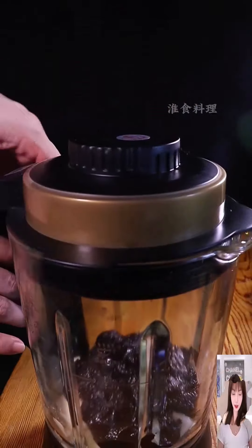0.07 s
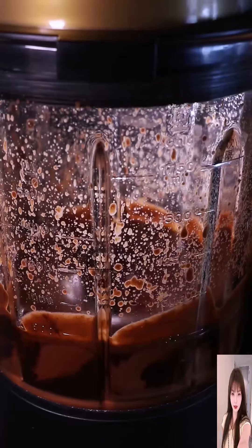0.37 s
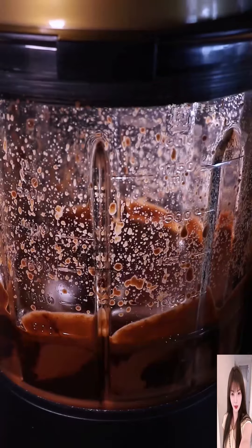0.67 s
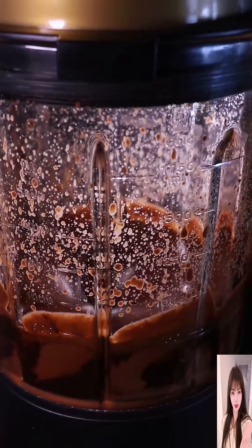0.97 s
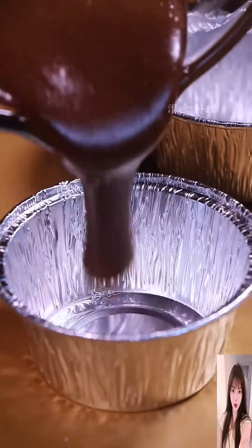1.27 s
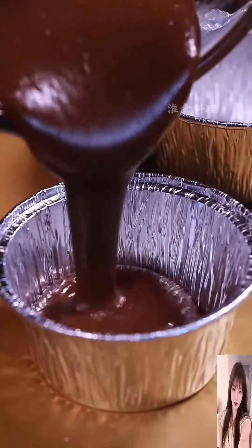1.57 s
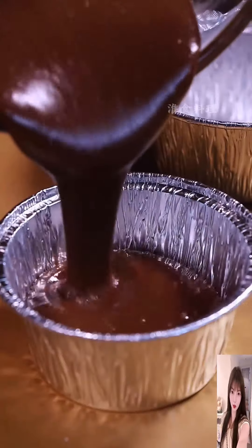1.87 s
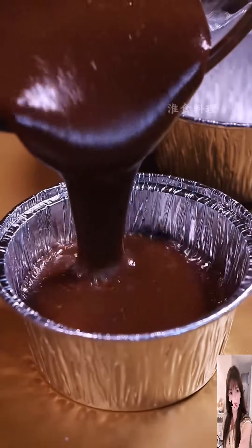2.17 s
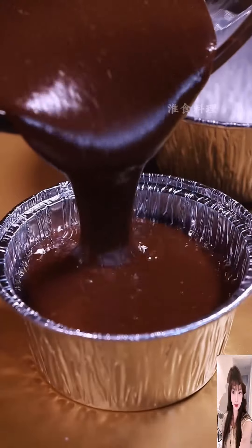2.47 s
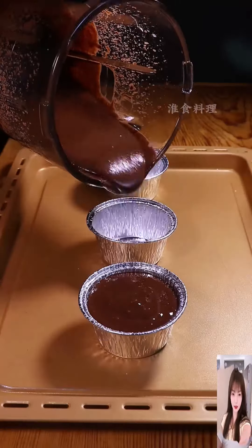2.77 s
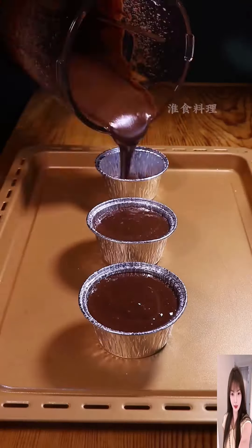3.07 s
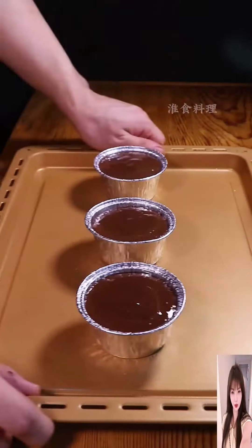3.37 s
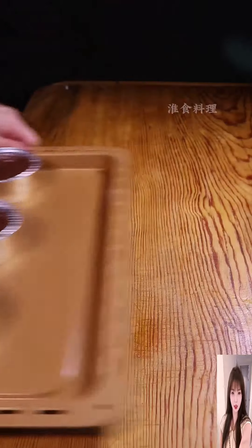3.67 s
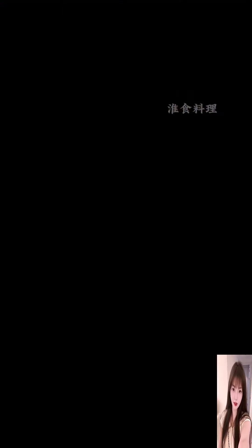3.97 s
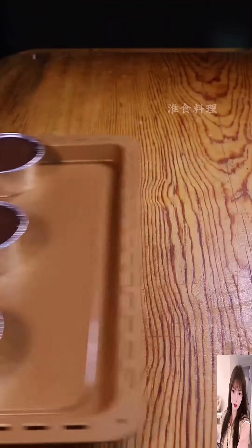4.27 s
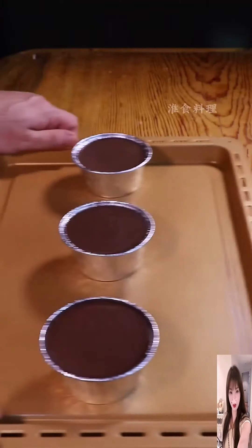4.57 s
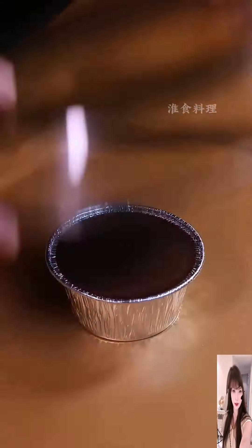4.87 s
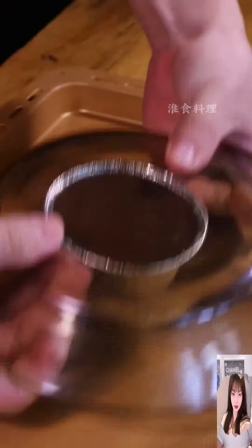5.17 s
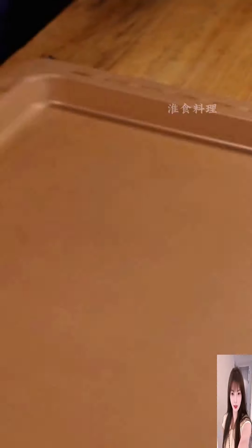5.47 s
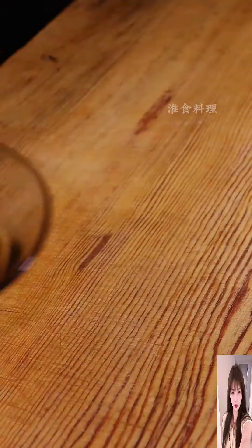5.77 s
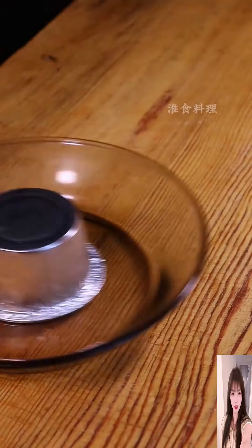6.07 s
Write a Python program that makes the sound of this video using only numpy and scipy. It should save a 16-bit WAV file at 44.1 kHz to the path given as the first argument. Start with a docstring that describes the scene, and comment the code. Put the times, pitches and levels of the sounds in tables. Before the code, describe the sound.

Heard close up at a wooden kitchen table, sharp knocks and lid rubbing lead into a brief, spattering blender churn. A quiet stretch follows, with crisp foil taps, softly popping batter and a clink of the jug. Then a metal tray slides twice with a ringing, juddering scrape, a glass plate lands with a hard knock, the tray scrapes once more, and the plate is pushed across the wood to a soft thud.

```python
"""A wooden kitchen table, close up, where chocolate puddings are being made. A blender jar is knocked
about, its lid is pressed home, and the blades churn batter for a second. Batter pours quietly into foil
cups, popping with air pockets, and a jug clinks. A metal baking tray slides over the table three times,
the wood grain plucking the sheet into a ringing scrape. A glass plate is knocked down and grinds
across the wood. Faint room air lies underneath."""
import sys
import numpy as np
from scipy import signal
from scipy.fft import rfft, irfft
from scipy.io import wavfile
from scipy.ndimage import uniform_filter1d

SR = 44100
rng = np.random.default_rng(int(sys.argv[2]) if len(sys.argv) > 2 else 0)


def inscribe(sig):
    """Save sig as 16-bit PCM at rate SR to the path in sys.argv[1].

    A 1-D sig is mono; a 2-D sig holds one channel per row.
    Samples are clipped to [-1, 1] before scaling.
    """
    pcm = np.round(np.clip(np.atleast_2d(sig).T, -1, 1) * 32767)
    wavfile.write(sys.argv[1], SR, pcm.astype(np.int16))


N = 277830
TIME = np.arange(N) / SR

# EQ of the churning batter: f/Hz, level/dB
CHURN_EQ = [(25, -26), (72, -15), (135, 0.5), (220, 0), (380, -1), (950, 4.5), (2400, 1), (2800, -3.5),
            (3500, -3), (4050, -5.5), (4400, -12), (4900, -11), (5400, -5.5), (6550, -4), (6850, -11.5),
            (7300, -19.5), (8200, -14), (9600, -29), (11500, -34), (15500, -38.5)]
# body of the filled jar: f/Hz, width/Hz, level/dB
JAR_RESONANCES = [(217.2, 19, 7), (318, 5.3, -6.5), (441, 22, -2.5), (519, 8.8, -2.5), (675, 35, 0),
                  (913, 11, 2.5), (1160, 32, -20), (1300, 45, 1.5), (1500, 13, -0.5), (1794, 28, -24),
                  (1900, 21, -1.5), (2007, 40, -24), (2500, 26, -0.5)]
def blender(start=0.485, end=1.338, level_db=-18, spin_up_s=0.18, spin_up_db=2, lift_db=1):
    """The blades tear the batter into a dense spatter that booms in the jar."""
    spin_up_left = np.clip(1 - (TIME - start) / spin_up_s, 0, 1)
    level = gate(start, end) * from_db(level_db - spin_up_db * spin_up_left)
    drops = grains(per_s=22000, spread_db=2.5, clump_db=1.5, clump_rate=260)
    spatter = colour(drops + from_db(1) * shifting(drops, t60=0.076, rate=12), CHURN_EQ)
    slaps = grains(per_s=5000, spread_db=2, clump_db=3.5, clump_rate=250)
    boom = resonate(slaps, JAR_RESONANCES, wander_db=2.2, wander_rate=22.1)
    jar_band = signal.butter(3, [140, 3500], "band", fs=SR, output="sos")
    boom = signal.sosfilt(jar_band, boom)
    tones, share = tone_clusters()
    churn = (from_db(-1) * spatter + from_db(-5.5) * boom + tones) / np.sqrt(1 + share ** 2)
    lift = from_db(lift_db * np.tanh(share / 2))   # slightly louder during a tone cluster
    return level * lift * evened(churn, 0.037)


# tone clusters: t/s, half length/s, level over the churn/dB, pitch ratio
TONE_CLUSTERS = [(.565, .02, 5, .88), (.617, .012, 2, 1.12), (.722, .015, 0, .97), (.868, .018, -1, 1.04),
                 (1.093, .021, 10, 1), (1.238, .014, -1, 1.02)]
# their partials at pitch ratio 1: f/Hz, level/dB
CLUSTER_PARTIALS = [(220, 1.5), (320, -2), (420, -2), (520, -2), (930, 0), (1060, -3.5), (1290, -3.5),
                    (1540, 2.5), (1710, -5), (1920, -3.5), (2110, -7), (2410, 0), (2920, -10.5), (3030, -3),
                    (3480, -14), (3990, -14), (4170, -13.5), (5180, -11), (5500, -5), (5750, -8.5),
                    (5950, -12), (6330, -9), (6680, -10)]
def tone_clusters(uneven_db=1.5):
    """Brief ringing tone clusters in the churning noise; returns the tones and their share over time."""
    tones, share = np.zeros(N), np.zeros(N)
    hz, partial_db = np.transpose(CLUSTER_PARTIALS)
    for s, half, db, pitch in TONE_CLUSTERS:
        near = np.abs(TIME - s) < 3 * half
        sizes = from_db(partial_db + uneven_db * rng.standard_normal(len(hz)))
        cycles = np.outer(pitch * hz, TIME[near]) + rng.random((len(hz), 1))
        swell = from_db(db) * bell(s, half)
        tones[near] += swell[near] * rms_one(sizes @ np.sin(2 * np.pi * cycles))
        share += swell
    return tones, share


# handling knocks: t/s, level/dB, hardness/(dB per octave), t60/s
JAR_KNOCKS = [(.0502, 18.5, -1.5, 0.013), (.0525, 7.5, 8, 0.024), (.057, 2, -1, .012), (.091, -14, 2, .015),
              (.131, -16, -1, 0.036), (.222, -8.5, 3, 0.041), (.2355, -3.5, 5, 0.048),
              (.3285, 12.5, 0, 0.034), (.337, 7.5, -6.5, 0.076), (.3475, 5.5, -4, 0.03),
              (.371, -14, 5, .015), (.4012, 7.5, 7.5, 0.021), (.4035, -1.5, 8.5, 0.21),
              (.4755, 3, 4.5, 0.016)]
# knock EQ: f/Hz, level/dB
JAR_EQ = [(80, -31), (230, 12.5), (900, -5), (4000, -1), (11000, -28), (16000, -60)]
# jar ring: f/Hz, level/dB, t60/s
JAR_MODES = [(180, -1, 0.09), (300, -5, .05), (490, -7, 0.07), (1075, 3, 0.098)]
def jar_knocks():
    """The handled jar answers each knock with a short, low ring."""
    return blows(JAR_KNOCKS, JAR_EQ, JAR_MODES, ring_db=-36, scatter=2.4)


# presses on the lid: start/s, end/s, level/dB
LID_RUBS = [(0.048, 0.136, -35), (0.254, 0.338, -38.5), (0.332, 0.488, -30.5)]
# rub EQ: f/Hz, level/dB
LID_EQ = [(24, -36), (40, 1.5), (298, 4.5), (746, -12), (1060, -1.5), (1390, -13.5), (3220, -12.5),
          (5430, -13), (15000, -56)]
def lid_rubs():
    """Pressed home, the lid creeps over the rim of the jar in small catches."""
    level = sum(from_db(db) * gate(start, end, fade=0.028) for start, end, db in LID_RUBS)
    catches = grains(per_s=3100, spread_db=1.5, clump_db=4.5, clump_rate=57.3)
    return level * colour(catches, LID_EQ)


# the tray bites harder or skids: t/s, half length/s, scrape boost/dB, rub and judder boost/dB
TRAY_BITES = [(3.62, 0.018, 2, 2), (3.678, 0.19, 0.5, -7), (3.779, 0.02, 4, -4), (3.825, 0.068, 1, 6),
              (3.926, 0.035, -3, -1.5), (3.944, 0.015, 7.5, 9), (4.212, 0.014, -0.5, 3),
              (4.292, 0.028, 1.5, -3), (4.348, 0.035, -2.5, -1), (4.461, 0.018, 3.5, 2),
              (4.512, 0.056, 1.5, -5), (4.592, 0.04, 7, 6.5), (4.644, 0.033, -1, 6.5),
              (4.674, 0.018, 5.5, 5), (4.75, 0.049, 0.5, -5.5), (4.844, 0.018, 1.5, 0),
              (5.646, 0.0061, 5.5, -1), (5.703, 0.045, 2.5, -5), (5.81, 0.031, 0.5, 5)]
# ring of the sheet metal, mids and highs: f/Hz, level/dB
TRAY_MODES = [(1066, -40.5), (1290, -36), (1480, -45), (2126, -44), (2500, -38.5), (2790, -29), (3005, -50),
              (3300, -32), (3650, -30), (3720, -31), (3860, -34)]
TRAY_HIGH_MODES = [(4200, -46), (4690, -37), (5017, -28.5), (5157, -51.5), (5320, -51), (5480, -31),
                   (5750, -34), (6200, -30), (6370, -39), (6573, -37), (6918, -50.5), (7730, -46)]
# EQs of scrape, hiss and judder: f/Hz, level/dB
SCRAPE_EQ = [(400, -26), (900, -1.5), (1350, 2.5), (1900, 3.5), (2600, 8), (3700, 1.5), (4400, -29),
             (6000, -58)]
TRAY_HISS_EQ = [(2500, -24.5), (4200, 1), (5300, 3), (7000, -4), (9000, -10.5), (10500, -20), (15500, -23)]
JUDDER_EQ = [(70, -18), (125, 6.5), (165, 13), (215, 13), (300, 3), (420, 3), (900, -41), (3000, -56.5)]
# hollow body of the rub: f/Hz, width/Hz, level/dB
RUB_RESONANCES = [(449, 87, 4), (564, 24, 0.5), (694, 110, 3), (822, 85, 6)]
def tray_slides():
    """Wood grain plucks the sheet metal: a scrape with ringing modes, over hollow rub and low judder."""
    scrape, ring, hiss, rub, judder, rumble = stroke_gains()
    bite, weight = from_db(sum(np.outer([db, low_db], bell(s, half))
                               for s, half, db, low_db in TRAY_BITES))
    plucks = grains(per_s=7000, spread_db=-1, clump_db=-0.5, clump_rate=97)
    plucks = plucks + from_db(7) * shifting(plucks, t60=0.13, rate=9)
    catches = grains(per_s=2900, spread_db=-1, clump_db=-0.5, clump_rate=150)
    sheet_modes = [(hz, 14 + hz / 170, db) for hz, db in TRAY_MODES]
    edge_modes = [(hz, 32, db) for hz, db in TRAY_HIGH_MODES]
    sheet = resonate(catches, sheet_modes, wander_db=5, wander_rate=20)
    edge = resonate(catches, edge_modes, wander_db=5.5, wander_rate=20)
    slips = grains(per_s=760, spread_db=2.5, clump_db=10.5, clump_rate=71)
    return (bite * scrape * from_db(-2.5) * evened(colour(plucks, SCRAPE_EQ), 0.04)
            + bite * ring * from_db(-5) * evened(sheet, 0.039)
            + bite * hiss * evened(colour(plucks, TRAY_HISS_EQ) + from_db(-6.5) * edge, 0.049)
            + weight * rub * evened(resonate(catches, RUB_RESONANCES, wander_db=3.5), 0.049)
            + weight * judder * evened(colour(slips, JUDDER_EQ), 0.013)
            + rumble * table_rumble())


# tray strokes: start/s, end/s, attack/s, release/s, level/dB, sag/(dB per s), dulling/(dB per s),
# then relative to that level: hiss/dB, rub/dB, judder/dB, rumble/dB
TRAY_STROKES = [(3.493, 4.005, 0.14, 0.026, -22, 2, 8.5, -3.5, -10, -10, -29),
                (4.213, 4.948, 0.041, 0.085, -25.5, 11.5, -0.5, -5, -14, -11.5, -14),
                (5.56, 5.851, 0.071, 0.0032, -21.5, -0.5, 11, -2, -11, -13, -20)]
def stroke_gains(attack_db_per_s=151, release_db_per_s=239, ring_lag=0.31):
    """Envelopes of the tray's layers: a stroke swells, sags and dies; dulling trades hiss for rub."""
    out = 0
    for start, end, attack, release, db, sag, dulling, *layer_db in TRAY_STROKES:
        hiss, rub, judder, rumble = from_db(layer_db)
        t = np.clip(TIME, start, end)
        from_middle = t - (start + end) / 2
        attack_db = attack_db_per_s * np.maximum(start + attack - t, 0)
        release_db = release_db_per_s * np.maximum(t - end + release, 0)
        scrape = gate(start, end, fade=0.0096) * from_db(db - sag * from_middle - attack_db - release_db)
        dull = from_db(dulling * from_middle)
        ring = scrape * dull ** ring_lag   # the sheet rings out as the stroke goes on
        out += np.array([scrape, ring, scrape * hiss / dull, scrape * rub * dull,
                         scrape * judder, scrape * rumble])
    return out


# notes of the tray's rim: t/s, half length/s, f/Hz, width/Hz, level/dB
RIM_NOTES = [(3.54, 0.044, 1310, 90, -39.5), (3.614, 0.057, 1320, 89.6, -35), (3.807, .04, 3330, 70, -30),
             (3.838, 0.026, 1450, 150, -23.5), (4.273, 0.037, 3720, 110, -24),
             (4.462, 0.096, 1330, 100, -26.5), (4.465, .04, 2560, 200, -40), (4.58, .025, 2530, 60, -26.5),
             (4.597, 0.023, 2980, 110, -21), (4.696, 0.048, 1350, 89, -30.5),
             (4.86, 0.054, 1320, 90, -33.5), (5.623, 0.04, 3330, 60, -26.5), (5.673, 0.037, 3670, 70, -26)]
def tray_rim():
    """Hollow metallic notes come and go as different parts of the rim catch on the wood."""
    friction = rng.standard_normal(N)
    return sum(from_db(db) * bell(s, half) * evened(resonate(friction, [(hz, width, 0)]), 0.05)
               for s, half, hz, width, db in RIM_NOTES)


# bumps: t/s, level/dB, hardness/(dB per octave), t60/s
TRAY_BUMPS = [(3.784, -2, -4, 0.033), (3.843, 6, -3.5, .02), (3.94, 2, 6.5, 0.024),
              (3.964, 15.5, 0.5, 0.024), (3.972, 16.5, -2, 0.067), (4.21, 4, -0.5, 0.034),
              (4.587, 4, -3, 0.02)]
# bump EQ: f/Hz, level/dB
BUMP_EQ = [(80, -12.5), (230, -1.5), (550, 1.5), (1000, -6.5), (3000, -3.5), (11000, -18), (16000, -33)]
# bump ring: f/Hz, level/dB, t60/s
BUMP_MODES = [(229, -1, 0.039), (470, -1.5, 0.082), (604, 0.5, 0.071), (1043, -7, .08)]
def tray_bumps():
    """The tray bumps on the table with a low clunk."""
    return blows(TRAY_BUMPS, BUMP_EQ, BUMP_MODES, ring_db=-37, scatter=2)


# glass on wood: t/s, level/dB, hardness/(dB per octave), t60/s
PLATE_KNOCKS = [(5.1875, 2, -5, 0.03), (5.1905, 8.5, -6.5, 0.022), (5.1932, 17, -5, 0.033),
                (5.2023, 25, 2.5, 0.049), (5.2085, 14.5, -5.5, 0.014), (5.213, 14, -3, 0.013),
                (5.218, 2, 3, .012), (6.272, 1.5, -12, 0.032), (6.294, 0, -10, 0.034)]
# knock EQ: f/Hz, level/dB
PLATE_EQ = [(80, -22), (230, -6), (900, 0), (4000, -15), (11000, -33), (16000, -29)]
# damped ring of the glass: f/Hz, level/dB, t60/s
PLATE_MODES = [(222, -6, 0.028), (830, 1, 0.03), (1180, -5, .035), (1490, 0, 0.04), (2760, -18, 0.035),
               (3640, -15, 0.033), (6320, -5, 0.011)]
def plate_knocks():
    """The plate lands in a tight cluster of hits, then thuds softly at the end of its push."""
    return blows(PLATE_KNOCKS, PLATE_EQ, PLATE_MODES, ring_db=-37, scatter=1.7)


# envelope of the grind: t/s, level/dB
PLATE_PUSH = [(5.86, -32.5), (5.93, -24.5), (6.015, -19), (6.06, -24), (6.19, -28.5), (6.255, -30),
              (6.3, -26)]
# EQs of grind and hiss: f/Hz, level/dB
GRIND_EQ = [(70, -12), (140, 0), (220, 1.5), (290, -1), (420, -4), (580, -16), (1150, -12), (1600, -31),
            (4000, -72)]
PLATE_HISS_EQ = [(700, 3.5), (1400, 5), (1750, -1.5), (2650, 2), (3000, -18), (3600, -2.5), (4400, -12),
                 (5700, -7), (7200, -11.5), (9000, -22), (15500, -23)]
# low and high resonances of the sliding plate: f/Hz, width/Hz, level/dB
PLATE_LOWS = [(270, 14, 11.5), (630, 25, -5), (763, 22, 3), (1197, 22, 1)]
PLATE_HIGHS = [(1914, 28, 0), (2680, 46, 14), (3330, 130, -5), (6740, 260, -9)]
def plate_push(hiss_db=-31.5, rumble_db=-38):
    """Heavy glass grinds dully over the wood, with a faint ringing hiss."""
    times, push_db = np.transpose(PLATE_PUSH)
    push = gate(times[0], times[-1], fade=0.0025) * from_db(np.interp(TIME, times, push_db))
    moving = gate(times[0], times[-1])
    bumps = grains(per_s=3500, spread_db=1, clump_db=2, clump_rate=78)
    grit = grains(per_s=8700, spread_db=1.5, clump_db=1, clump_rate=370)
    body = from_db(-3.5) * resonate(bumps, PLATE_LOWS, wander_db=1.5)
    grind = evened(colour(bumps, GRIND_EQ) + body, 0.069)
    hiss = colour(grit + shifting(grit, t60=0.11, rate=10), PLATE_HISS_EQ)
    ring = from_db(-11.5) * resonate(grit, PLATE_HIGHS, wander_db=3.5)
    sheen = from_db(hiss_db) * rms_one(hiss + ring)
    return push * grind + moving * (sheen + from_db(rumble_db) * table_rumble())


# groans of tray and plate: t/s, half length/s, f/Hz, level/dB, fall per harmonic/dB
GROANS = [(3.788, 0.019, 230, -23, 25), (4.274, 0.021, 149.2, -24, 6), (4.38, 0.013, 232, -30, 19),
          (4.635, 0.035, 161.3, -24, 9.5), (5.67, 0.009, 160, -23, 10.5), (5.709, .01, 151, -24.5, 20),
          (5.826, 0.028, 701, -21, 29), (5.927, 0.024, 630, -27.5, 28), (5.97, .012, 470, -23.5, 22),
          (6.012, 0.016, 303, -19.5, 26)]
def groans():
    """A dragged rim sticks and slips on the wood at an unsteady rate for a moment."""
    out = np.zeros(N)
    for s, half, hz, db, fall_db in GROANS:
        near = np.abs(TIME - s) < 3 * half
        waver = rms_one(uniform_filter1d(rng.standard_normal(near.sum()), 200))
        phase = 2 * np.pi * np.cumsum(hz * (1 + 0.036 * waver)) / SR
        tone = np.sqrt(2) * sum(from_db(-fall_db * k) * np.sin((k + 1) * phase) for k in range(4))
        out[near] += from_db(db) * bell(s, half)[near] * tone
    return out


# jolts of the table top: t/s, level/dB
JOLTS = [(.285, -30.5), (3.505, -38.5), (3.96, -38), (4.275, -29.5), (4.39, -25.5), (4.565, -22),
         (4.62, -22.5), (4.685, -22), (4.745, -25), (4.845, -25.5), (5.675, -30), (5.825, -26),
         (5.935, -38), (6.012, -29), (6.24, -22.5), (6.285, -31)]
def table_jolts():
    """The table's rumble swells briefly as things are pressed on it or dragged over it."""
    return table_rumble() * sum(from_db(db) * bell(s, half=0.018) for s, db in JOLTS)


# low end of the table: f/Hz, level/dB
RUMBLE_EQ = [(15, -32.5), (32, -9), (55, -2.5), (85, -2.5), (120, -17.5), (220, -40), (800, -69)]
def table_rumble():
    """The shaking table top gives a deep, even noise."""
    return evened(colour(rng.standard_normal(N), RUMBLE_EQ), 0.017)


# taps on the cups: t/s, level/dB, hardness/(dB per octave), t60/s
FOIL_TAPS = [(1.3662, 5, 3, 0.015), (1.368, 0, 3, 0.056), (1.377, -6.5, 3.5, 0.15), (1.4522, 8, -4, 0.028),
             (1.458, -1, -4.5, 0.14)]
# tap EQ: f/Hz, level/dB
FOIL_EQ = [(80, -42), (230, -16), (900, 0.5), (4000, 1), (11000, -18.5), (16000, -29)]
# foil ring: f/Hz, level/dB, t60/s
FOIL_MODES = [(2520, 8, 0.08), (5600, -7, 0.05), (6100, -8, 0.05)]
def foil_cups():
    """Tapped foil gives a crisp tick with a faint, thin ring."""
    return blows(FOIL_TAPS, FOIL_EQ, FOIL_MODES, ring_db=-49, scatter=1.4)


# clinks: t/s, level/dB, hardness/(dB per octave), t60/s
JUG_CLINKS = [(2.9193, 2, 2, 0.0093), (2.921, 3.5, 2, 0.011), (2.927, 1, -1, 0.084), (2.988, -9, -5.5, .03)]
# clink EQ: f/Hz, level/dB
JUG_EQ = [(80, -27.5), (230, -5.5), (900, -8), (4000, -2), (11000, 3), (16000, -29)]
# jug ring: f/Hz, level/dB, t60/s
JUG_MODES = [(3811, -9, .08), (4700, -2, 0.11), (5024, -14, .3), (6350, -10, 0.08), (7267, -2, 0.07),
             (11100, -1.5, 0.035)]
def jug_clinks():
    """Light contacts set the jug's high modes ringing."""
    return blows(JUG_CLINKS, JUG_EQ, JUG_MODES, ring_db=-36, scatter=6.2)


# pops in the poured batter: t/s, f/Hz, level/dB
POPS = [(1.972, 1050, -55), (2.068, 1820, -53), (2.072, 486, -45), (2.406, 1780, -45.5), (2.718, 1780, -52),
        (2.803, 1720, -52), (3.06, 980, -49)]
def batter_pops(swell_s=0.0053, blur_hz=130):
    """Each air pocket gives a short wet pop, its pitch blurred by the thick batter."""
    out, fizz = np.zeros(N), rng.standard_normal(N)
    for s, hz, db in POPS:
        age = np.clip((TIME - s) / swell_s, 0, 30)
        note = evened(resonate(fizz, [(hz, blur_hz, 0)]), 0.0088)
        out += from_db(db) * age * np.exp(1 - age) * note
    return out


# stretches of the bed: start/s, end/s, rumble/dB, murmur/dB, hiss/dB, stereo width/dB
BED = [(0, 0.488, -57, -48.5, -47.5, -30), (1.34, 2.885, -65, -51.5, -50.5, -1.5),
       (2.897, 4.037, -80, -60.5, -52.5, -19.5), (4.189, 4.917, -69, -57.5, -62, -12),
       (4.918, 5.55, -51, -50, -49, -5)]
# EQs of murmur, room air and rush: f/Hz, level/dB
MURMUR_EQ = [(60, -12.5), (160, 9), (300, 4), (700, -0.5), (1200, -6), (2500, -47)]
AIR_EQ = [(300, 12), (1000, 12.5), (1800, 9.5), (2600, 7.5), (5000, 8), (9000, 6), (15500, 3.5)]
RUSH_EQ = [(59, -52), (110, -27), (297, 1), (337, -6), (399, 0), (462, 1), (1560, -0.5), (7670, -9),
           (15000, -25)]
# the bed ducks after the hardest knocks: t/s, depth/dB
DIPS = [(.055, 8.5), (5.21, 11.5)]
def background(rush_db=-44.5, murmur_width_db=-8.5, recovery_s=0.24):
    """Room air, the murmur of hands and thick batter, and a soft rush as more cups are filled."""
    levels = 0
    for start, end, rumble_db, murmur_db, hiss_db, width_db in BED:
        side_db = [murmur_db + width_db + murmur_width_db, hiss_db + width_db]
        levels += np.outer(from_db([rumble_db, murmur_db, hiss_db, *side_db]), gate(start, end))
    rumble, murmur, hiss, side_murmur, side_hiss = levels
    rush = from_db(rush_db) * gate(2.88, 3.465, fade=0.0069)
    handling = colour(grains(per_s=910, spread_db=0, clump_db=2, clump_rate=34), MURMUR_EQ)
    air = colour(rng.standard_normal(N), AIR_EQ)
    trickle = grains(per_s=12000, spread_db=2.5, clump_db=1.5, clump_rate=21)
    flow = evened(colour(trickle, RUSH_EQ), 0.049)
    middle = rumble * table_rumble() + murmur * handling + hiss * air + rush * flow
    side = side_hiss * colour(rng.standard_normal(N), AIR_EQ)
    side += side_murmur * colour(rng.standard_normal(N), MURMUR_EQ)
    dip_db = sum(depth * (TIME > s) * np.exp(-np.abs(TIME - s) / recovery_s) for s, depth in DIPS)
    return from_db(-dip_db) * (middle + side * np.array([[1], [-1]]))


def blows(hits, eq, modes, ring_db, scatter, pivot_hz=1500, size=16384):
    """Each contact is a click, a quickly dying clatter and the object's ring; harder is brighter."""
    t, out = np.arange(size) / SR, np.zeros(N + size)
    edges = np.geomspace(60, 16000, 14)
    bands = [signal.butter(2, pair, "band", fs=SR, output="sos") for pair in zip(edges, edges[1:])]
    for s, strength_db, hardness, t60 in hits:
        hit = np.zeros(size)
        for hz, db, mode_t60 in modes:
            mode_db = ring_db + db + hardness * np.log2(hz / pivot_hz)
            hit += from_db(mode_db - 60 * t / mode_t60) * np.sin(2 * np.pi * hz * t)
        for sos, low, high in zip(bands, edges, edges[1:]):
            hz = np.sqrt(low * high)
            band_t60 = t60 * (hz / 1000) ** -0.15   # lows last longer
            clatter = rng.standard_normal(size) * from_db(-60 * t / band_t60)
            force = scatter * clatter / np.linalg.norm(clatter) + (t == 0)
            band = signal.sosfilt(sos, force + 1e-18)
            band_db = at_hz(eq, hz) + hardness * np.log2(hz / pivot_hz)
            hit += from_db(band_db) * np.sqrt(2 * (high - low) / SR) * band / np.linalg.norm(band)
        out[round(s * SR):][:size] += from_db(strength_db) * hit
    return out[:N]


def grains(per_s, spread_db, clump_db, clump_rate):
    """Countless tiny impacts of uneven size that come in clumps; rms 1."""
    born = rng.random(N) < per_s / SR
    sizes = from_db(spread_db * np.minimum(rng.exponential(1, N), 4) + clump_db * drift(clump_rate))
    return rms_one(born * sizes * rng.choice([-1, 1], N))


def resonate(x, resonances, wander_db=0, wander_rate=14):
    """Parallel resonances, each fed more or less as the contact moves; rms 1."""
    out = 0
    for hz, width, db in resonances:
        r = np.exp(-np.pi * width / SR)
        ringing = signal.lfilter([1, 0, -1], [1, -2 * r * np.cos(2 * np.pi * hz / SR), r * r], x)
        out += from_db(db + wander_db * drift(wander_rate)) * rms_one(ringing)
    return rms_one(out)


def shifting(x, t60, rate):
    """Many weak modes whose mix changes as the contact moves."""
    return evened(sum(drift(rate) * diffuse(x, t60) for _ in range(3)), 0.061)


def diffuse(x, t60, size=8192):
    """Countless close modes or echoes, all dying in t60; the power is kept."""
    response = rng.standard_normal(size) * from_db(-60 * np.arange(size) / SR / t60)
    return signal.fftconvolve(x, response / np.linalg.norm(response))[:N]


def widen(x, side_db, t60):
    """Faint early reflections differ between the two sides."""
    return x + from_db(side_db) * diffuse(x, t60) * np.array([[1], [-1]])


def colour(x, eq, size=4096):
    """Minimum-phase filter along an EQ curve; rms 1."""
    hz = np.maximum(np.arange(size // 2 + 1) * SR / size, 1)
    cepstrum = irfft(np.log(from_db(at_hz(eq, hz))))
    cepstrum[1:size // 2] *= 2
    cepstrum[size // 2 + 1:] = 0
    response = irfft(np.exp(rfft(cepstrum)))
    return rms_one(signal.fftconvolve(x, response)[:N])


def at_hz(eq, hz):
    """Read an EQ curve in dB on a log-frequency axis."""
    known_hz, db = np.transpose(eq)
    return np.interp(np.log(hz), np.log(known_hz), db)


def drift(rate):
    """Random wander with `rate` steps a second; spread 1."""
    steps = rng.standard_normal(4000)
    return np.interp(TIME, np.arange(len(steps)) / rate, steps) * np.sqrt(3 / 2)


def evened(x, seconds):
    """Hold the short-time level at 1, as under a steady push."""
    return x / np.sqrt(np.abs(uniform_filter1d(x * x, max(int(seconds * SR), 2))) + 1e-6)


def gate(start, end, fade=0.0043):
    """Open from start to end, with a short fade on either side."""
    return np.clip(1 + np.minimum(TIME - start, end - TIME) / fade, 0, 1)


def bell(s, half):
    """A brief swell of height 1 around a moment."""
    return np.exp(-np.minimum(((TIME - s) / half) ** 2, 50))


def from_db(db):
    """Decibels to gain."""
    return 10 ** (np.asarray(db) / 20)


def rms_one(x):
    """Scale to rms 1."""
    return x / np.sqrt(np.mean(x ** 2) + 1e-20)


def scene():
    """Everything sits close and centred; only the foil cups and the bed have some width."""
    jar = jar_knocks() + lid_rubs()
    cups = foil_cups()
    knocks = jug_clinks() + plate_knocks() + tray_bumps()
    dragging = tray_slides() + tray_rim() + plate_push() + groans() + table_jolts()
    centre = blender() + jar + knocks + dragging
    return centre + widen(cups, side_db=-15, t60=0.052) + batter_pops() + background()


def record(dry, ceiling=1.3, cutoff_hz=16100):
    """Soft saturation rounds the peaks and a steep low-pass cuts the top."""
    lowpass = signal.ellip(10, 0.1, 80, cutoff_hz, fs=SR, output="sos")
    return signal.sosfilt(lowpass, ceiling * np.tanh(dry / ceiling))


dry = scene()
out = record(dry)
inscribe(out)
```